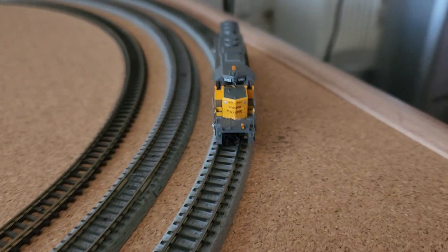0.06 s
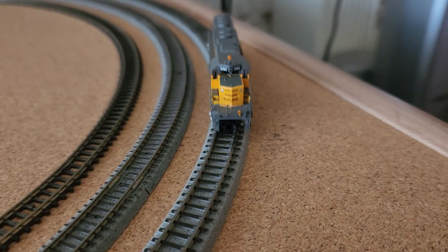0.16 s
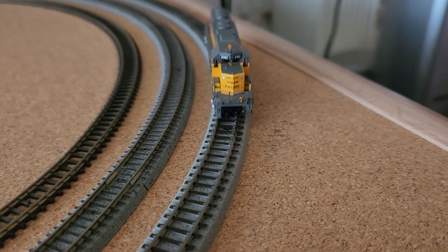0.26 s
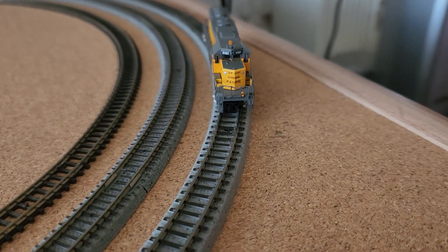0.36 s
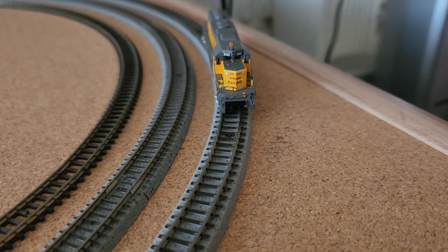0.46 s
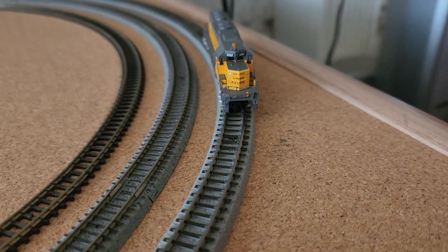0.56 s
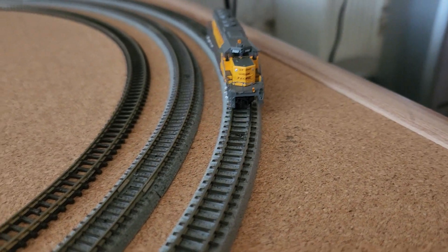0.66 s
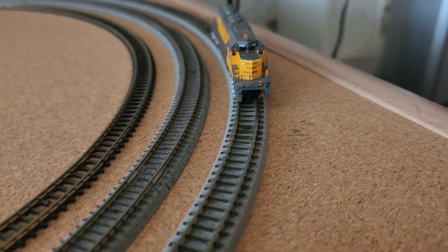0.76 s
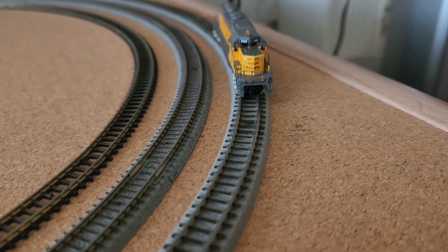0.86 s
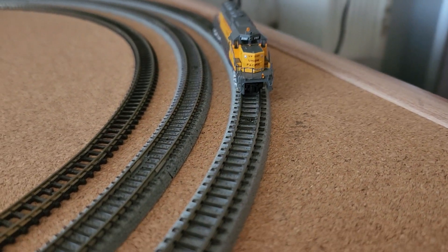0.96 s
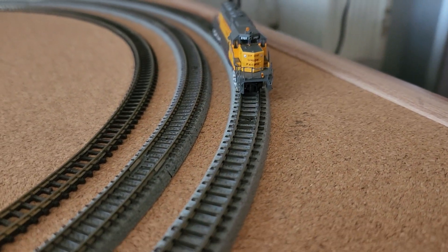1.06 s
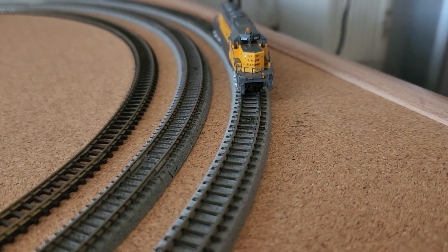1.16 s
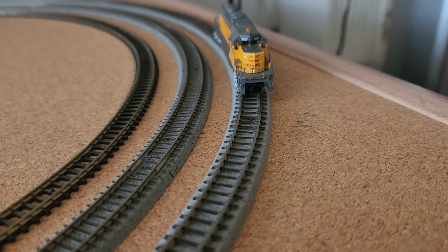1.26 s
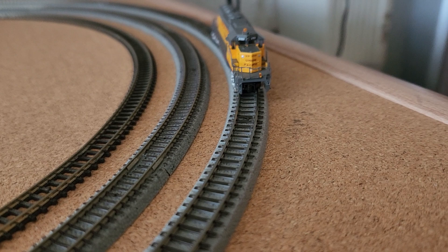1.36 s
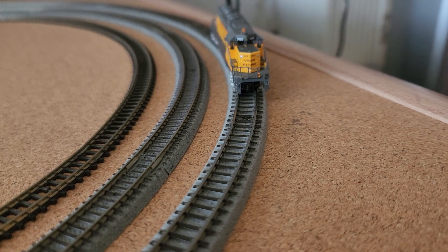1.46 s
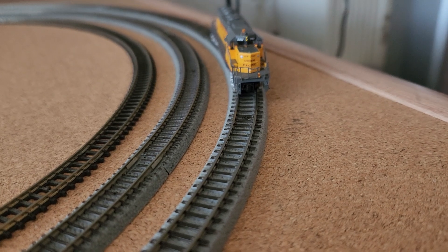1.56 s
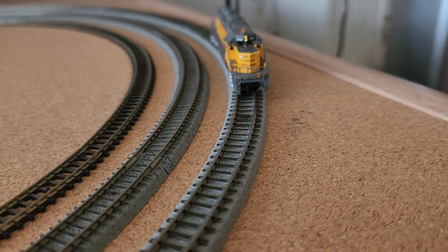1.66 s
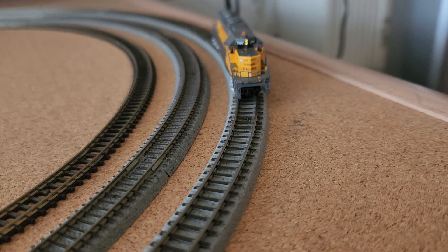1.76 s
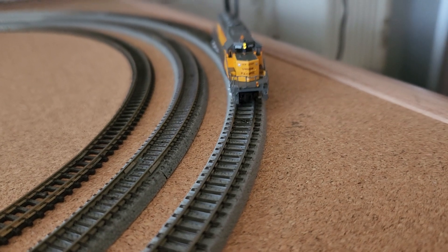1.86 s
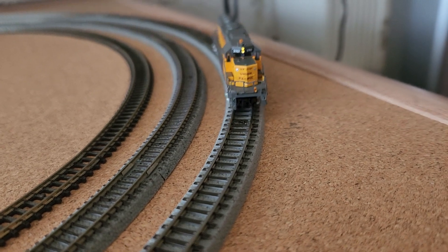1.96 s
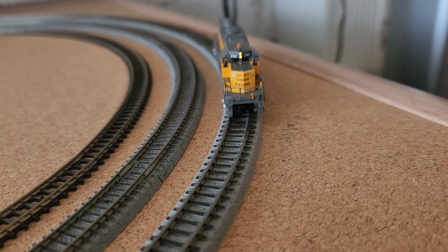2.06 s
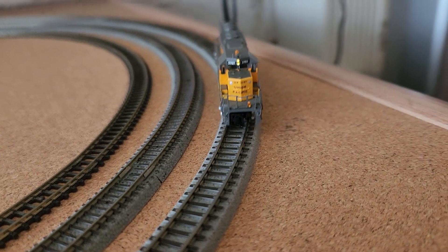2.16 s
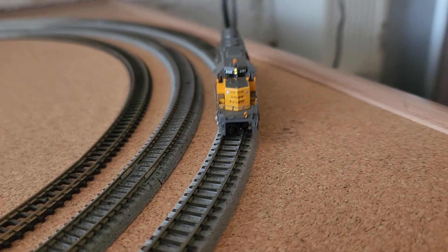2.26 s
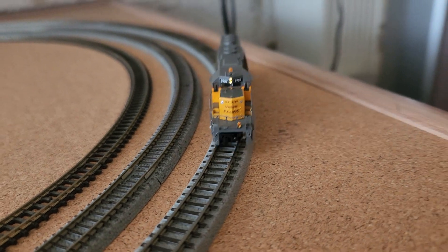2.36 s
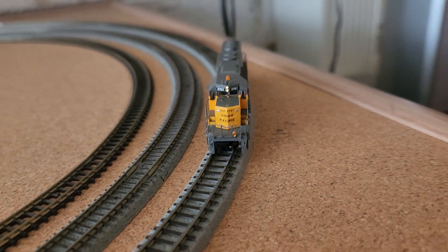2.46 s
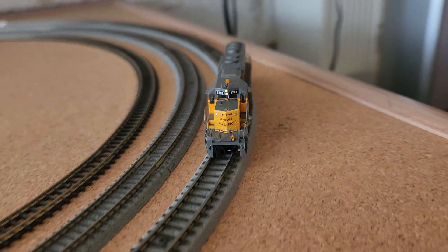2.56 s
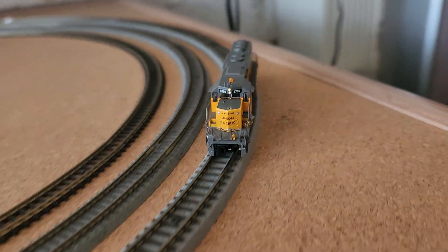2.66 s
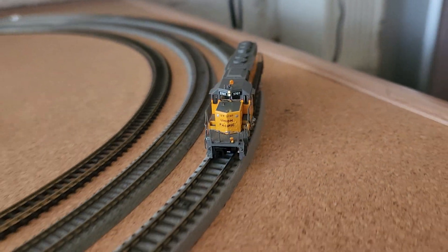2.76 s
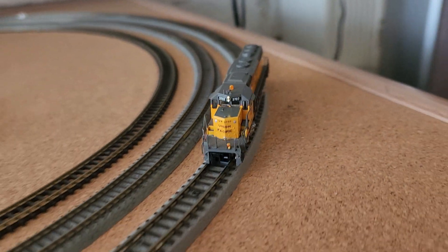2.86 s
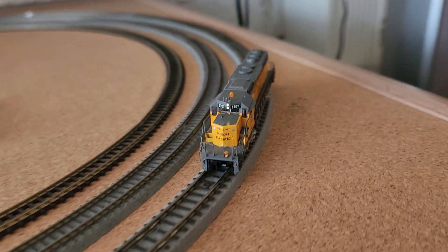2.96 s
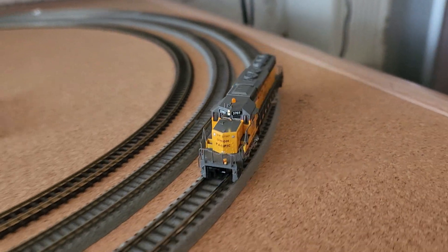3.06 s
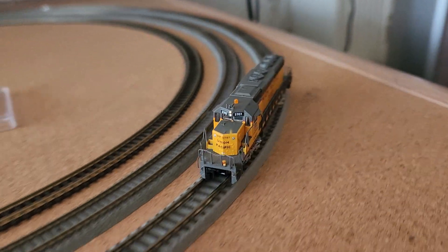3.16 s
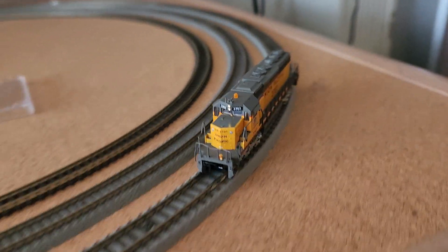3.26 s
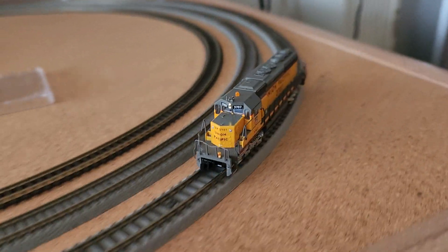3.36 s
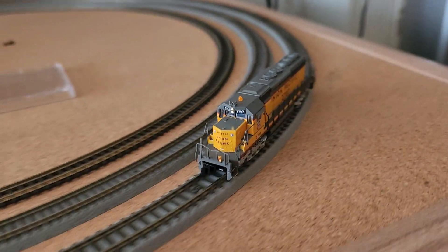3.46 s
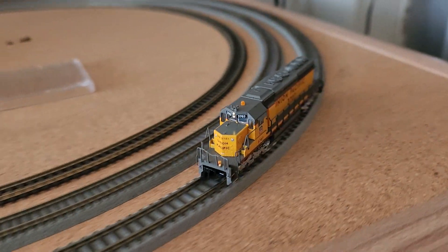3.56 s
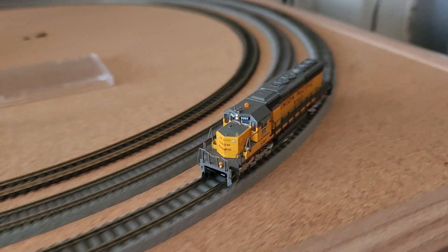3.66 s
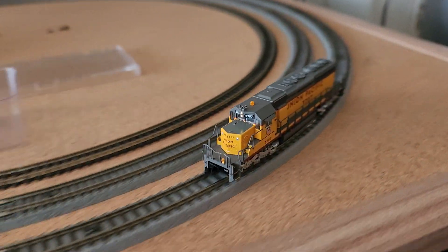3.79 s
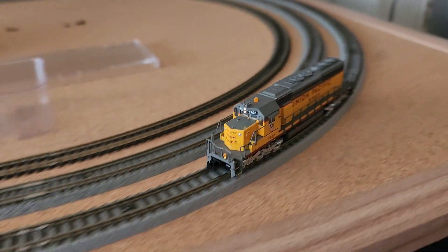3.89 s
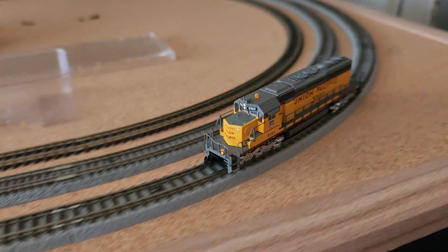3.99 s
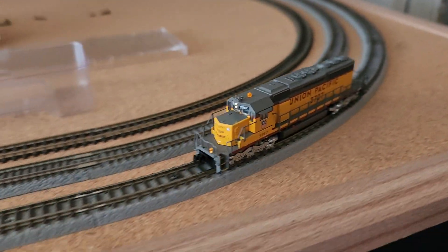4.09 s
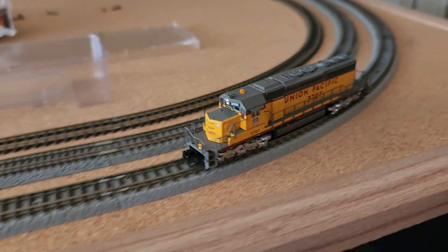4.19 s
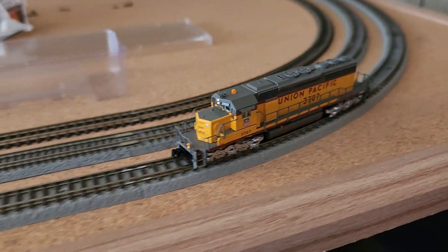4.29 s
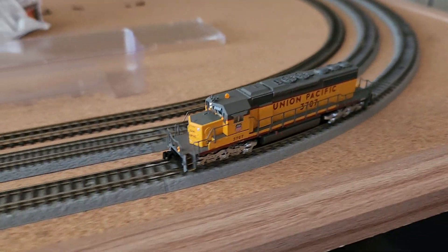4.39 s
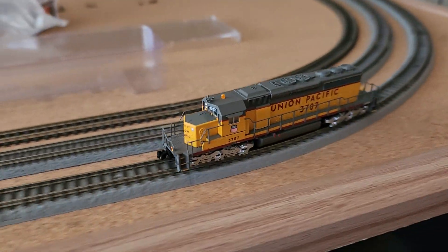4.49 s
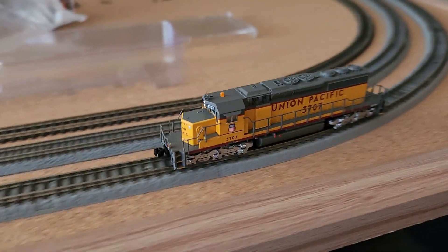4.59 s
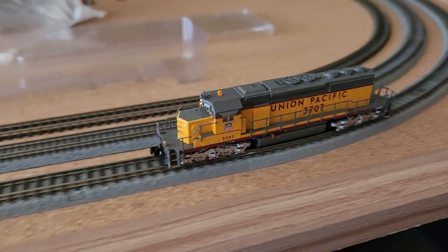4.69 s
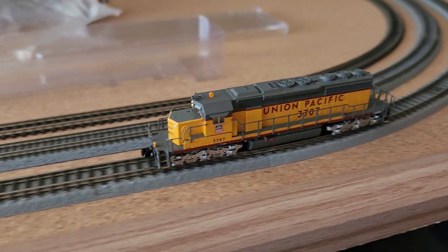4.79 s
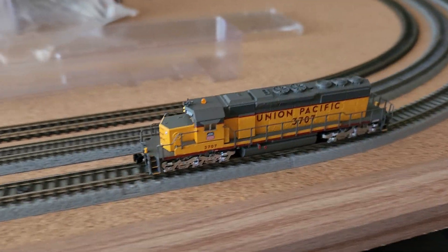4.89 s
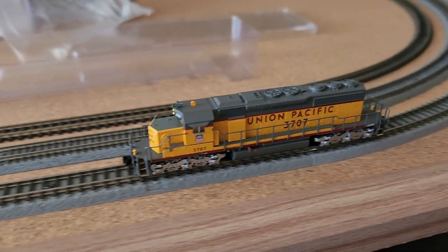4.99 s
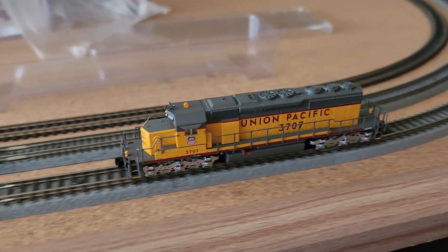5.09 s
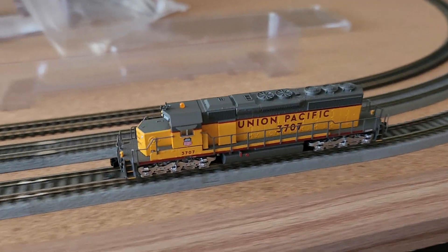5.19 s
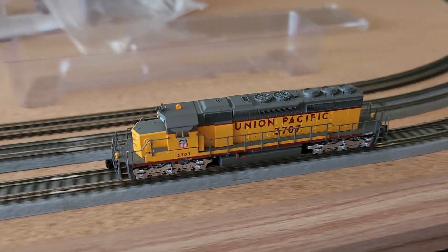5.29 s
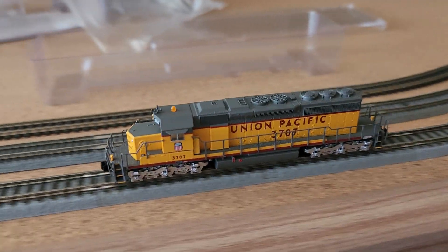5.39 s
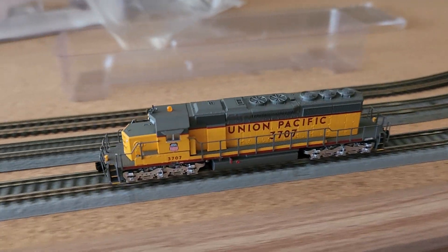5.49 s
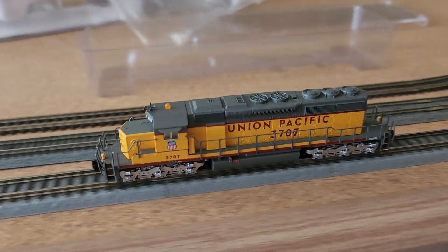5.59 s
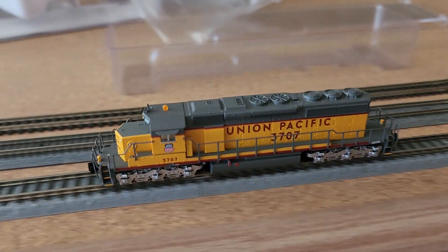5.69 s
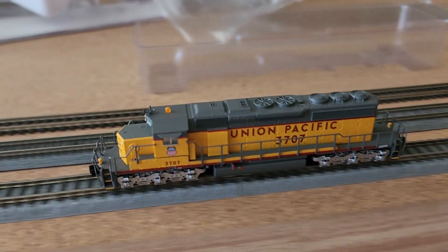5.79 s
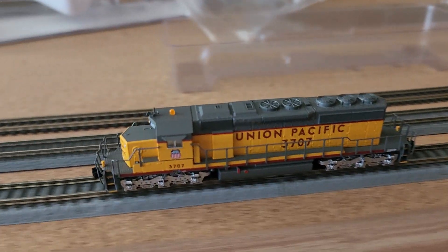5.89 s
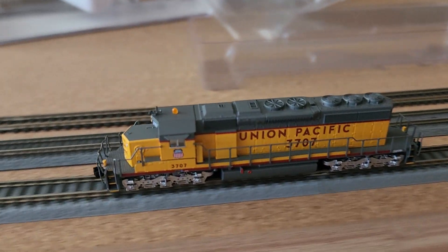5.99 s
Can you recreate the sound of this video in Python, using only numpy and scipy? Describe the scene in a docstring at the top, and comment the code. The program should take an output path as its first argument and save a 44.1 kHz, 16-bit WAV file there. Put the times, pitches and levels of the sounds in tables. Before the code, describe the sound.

A model locomotive rolls on a tabletop track with a gritty rumble and slows to a stop. Soft knocks on the board, a small switch click and a brief rub follow, then one heavy thump close to the microphone on the left. The train sets off again, wheels ticking over joints and hissing on the rails, while a thin gear whine and a low motor hum grow as it passes close by in a quiet room.

```python
"""Model locomotive on a tabletop

A small locomotive rolls to a halt on a cork-covered table. Soft knocks, a switch click and a heavy thump
follow, then it sets off again past a hand-held phone. Wheels shake the board, tick over joints and hiss
on the rails; gears whine, the three-pole motor hums and its brushes rasp in the shell, in a quiet room."""
import sys
import numpy as np
from scipy import signal
from scipy.fft import rfft, irfft
from scipy.io import wavfile
from scipy.ndimage import uniform_filter1d

SR = 44100
rng = np.random.default_rng(int(sys.argv[2]) if len(sys.argv) > 2 else 0)


def wrap_up_sound(samples):
    """Save the sound to the file named by the first command line argument, as 16-bit audio."""
    columns = np.atleast_2d(samples).T
    # keep every value between -1 and 1, then stretch to whole-number steps
    tamed = np.clip(columns, -1, 1)
    steps = np.round(tamed * 32767).astype(np.int16)
    wavfile.write(sys.argv[1], SR, steps)


N = 266364
T = np.arange(N) / SR

# resonances of the rails and wheel flanges: f/Hz, width/Hz, nose-on level/dB, side-on level/dB
RAIL_MODES = [(5330, 1000, -0.5, -14.5), (6510, 600, 0.5, -9.5), (7210, 600, 5.5, -4),
              (8270, 1900, -3, -10)]
FLANGE_MODES = [(10040, 440, -15, 4), (11060, 800, -0.5, 2), (12570, 1200, 2, 0), (15200, 2800, 0.5, -4.5)]


def undb(db):
    """Decibels to gain."""
    return 10 ** (np.asarray(db) / 20)


def unit(x):
    """Scale to rms 1."""
    return x / np.sqrt(np.mean(x ** 2))


def curve(points):
    """Automation lane through (time, value) points."""
    return np.interp(T, *np.transpose(points))


def pan(db):
    """Stereo gains with the left db louder than the right."""
    return undb(db * np.array([[.5], [-.5]]))


def walk(rate_hz):
    """Smooth random drift: held steps, slewed twice; rms 1."""
    hold = int(SR / rate_hz)
    steps = np.repeat(rng.standard_normal(N // hold + 1), hold)
    return unit(uniform_filter1d(uniform_filter1d(steps, hold), hold)[:N])


def add(out, start, sound, pan_db=0., lag_ms=0.):
    """Mix in a short mono sound; it reaches the right channel lag_ms later."""
    for ch, gain in enumerate(pan(pan_db)):
        i = int((start + ch * lag_ms / 1000) * SR)
        out[ch, i:i + len(sound)] += gain * sound[:N - i]


def stereo_noise(grain, pan_db, coherence, lag_ms):
    """Noise textured by grain: a shared part, lag_ms later on the left, plus a diffuse part."""
    shared, left, right = rng.standard_normal((3, N)) * grain
    delay = np.exp(-2j * np.pi * np.fft.rfftfreq(N, 1 / SR) * lag_ms / 1000)
    direct = np.array([irfft(rfft(shared) * delay, N), shared])
    return (np.sqrt(coherence) * direct + np.sqrt(1 - coherence) * np.array([left, right])) * pan(pan_db)


def resonate(x, modes, side=0., wander_db=0.):
    """Bank of steep resonances; side morphs their levels from nose-on (0) to side-on (1)."""
    out = 0
    for k, (hz, width, nose_db, side_db) in enumerate(modes):
        b, a = signal.iirpeak(hz, hz / (1.55 * width), fs=SR)
        db = nose_db + side * (side_db - nose_db)
        if wander_db:
            db = db + wander_db * (walk(11) + np.array([walk(2.5), walk(2.5)]))
        out = out + (-1) ** k * undb(db) * signal.lfilter(b, a, signal.lfilter(b, a, x))
    return out


def ring(modes, detune=0.):
    """Decaying modes of a struck body, each swelling over its first cycle; peak 1."""
    t = T[:SR // 2]
    tuning = 1 + detune * rng.standard_normal(len(modes))
    y = sum(undb(db - 60 * t / t60) * (1 - np.exp(-hz * t)) * np.sin(2 * np.pi * hz * tune * t)
            for (hz, db, t60), tune in zip(modes, tuning))
    return y / np.abs(y).max()


def strike(modes, contact_s, detune):
    """Modes driven by a short, crumbling contact; peak 1."""
    t = T[:int(contact_s * SR)]
    crumbs = np.abs(rng.standard_normal(len(t))) * rng.choice([-1, 1, 1], len(t))
    force = crumbs * np.sin(np.pi * np.sqrt(t / contact_s))
    force = np.convolve(force, np.hanning(SR // 3000))  # soft fingers and cork dull the top
    y = signal.fftconvolve(ring(modes, detune), force)
    return y / np.abs(y).max()


def rolling(brush_gate):
    """Gritty rolling and rubbing noise excites the board, roadbed, shell, rails and flanges."""
    # resonances of each part: f/Hz, width/Hz, nose-on level/dB, side-on level/dB
    board_bass = [(148.6, 27.5, 5.5, -3.5), (197.7, 21, -3, -1.5), (244, 42.5, -7, -3),
                  (302.1, 18.5, 2.5, -6.5), (355.6, 35, -8, -5.5)]
    board_middle = [(416, 58, -0.5, -25.5), (538.6, 46, 5, 0.5), (638, 64, -4, 3.5), (800, 105, -4.5, -2)]
    roadbed = [(984, 360, -8, -14), (1230, 350, -2.5, -8), (1300, 73, 5, -3), (1446.5, 93, 1.5, -6),
               (1923, 630, -14.5, -10.5)]
    shell = [(2110, 440, -4, 8.2), (3116, 730, -5.5, 13.2), (4072, 520, -0.5, 17.6)]
    parts = [board_bass, board_middle, roadbed, shell, RAIL_MODES, FLANGE_MODES]
    # fader of each part: base gain/dB, effort slope/(dB/dB), boost when near/dB, boost side-on/dB
    faders = [(-53.5, 0.6, -1, -2.5), (-49, 1.29, -5, -3.5), (-53.5, 1.3, -0.3, -4.5),
              (-67.5, 1.25, 9, 4.5), (-62.5, 1.27, 2, -0.5), (-73, 1.64, 4.5, 12.5)]
    # stereo image of each part: pan/dB, coherence/0-1, left lag/ms
    images = [(4, 0.88, -0.39), (9.5, 0.69, -0.056), (8, 0.27, -0.054), (5.5, 0.21, 0.195),
              (8, 0.18, 0.104), (10, 0, -0.101)]
    # rolling effort, 0 at full pace: t/s, level/dB
    effort = [(0, 0.5), (.3, -2.5), (.55, -8), (.74, -20), (.9, -50.5), (1.58, -12.5), (1.78, -10.5),
              (1.95, -4.5), (2.3, -2), (2.75, -1), (3.7, 0), (4.7, -1), (5.1, -1.5), (5.55, -0.5),
              (6.04, .5)]
    # how far the flank has turned to the phone: t/s, side-on/0-1
    heading = [(2.5, 0.15), (3.5, 0.1), (4.3, 0.33), (5.1, 0.64)]
    # swells on top of the effort: t/s, board bass/dB, roadbed growl/dB, shell rasp/dB
    surges = [(2.1, -0.5, -1, -1), (2.25, 5.5, -0.5, -2), (2.65, -3.5, -0.5, 0.5), (2.9, 0, 4.5, 3),
              (3.37, 1, 1.5, -2.5), (3.698, 3.5, 0.5, 0), (4.18, 2.5, 2.5, -1), (4.75, -4.5, 0, -1),
              (5.45, 2, -1, 0), (6.04, 2.5, -1, 1.5)]
    times, *lanes = np.transpose(surges)
    bass, growl, rasp = (np.interp(T, times, lane) for lane in lanes)
    swells = [bass, 0, growl, rasp, 0, 0]
    effort_db, side = curve(effort), curve(heading)
    near = curve([(2.84, 0), (3.46, 1)])
    jolt_db = .64 * walk(14)  # uneven track shakes every part at once
    grit = undb(1.23 * walk(300))
    grains = [grit, grit, grit, grit * brush_gate, grit, grit]
    out = 0
    for modes, fader, grain, image, swell_db in zip(parts, faders, grains, images, swells):
        base_db, slope, near_db, side_db = fader
        sound = resonate(stereo_noise(grain, *image), modes, side, wander_db=1.6)
        running_rms = np.sqrt(uniform_filter1d(sound.mean(axis=0) ** 2, size=SR))
        db = base_db + swell_db + slope * effort_db + near_db * near + side_db * side + jolt_db
        out = out + sound / running_rms * undb(db)
    return out * pan(-4 * side)  # the image slides right as the flank comes round


def curve_hiss(width_hz=650):
    """Wheels bear on the curve: narrow bands of hiss that glide upward."""
    # wheel hisses: t/s, length/s, start f/Hz, end f/Hz, level/dB, pan/dB
    glides = [(0, .5, 7300, 8100, -72, 9), (4.6, 1.3, 10700, 11600, -72, -6)]
    lowpass = signal.butter(2, width_hz / 2, fs=SR, output="sos")
    out = np.zeros((2, N))
    for start, length, from_hz, to_hz, db, pan_db in glides:
        progress = T[:int(length * SR)] / length
        flutter = signal.sosfilt(lowpass, rng.standard_normal((2, len(progress))))
        phase = 2 * np.pi * np.cumsum(from_hz + (to_hz - from_hz) * progress) / SR
        hiss = unit(flutter[0] * np.cos(phase) + flutter[1] * np.sin(phase))
        add(out, start, undb(db) * hiss * np.sin(np.pi * progress), pan_db)
    return out


def room_tone(air_db=-57.5, mains_hz=58.4, mains_db=-64.5):
    """Still air, wavering mains hum and a low rumble through the table."""
    # spectrum of the air: f/Hz, relative level/dB
    air_spectrum = [(13, -41), (22, -22.5), (97, -5.5), (121, -13), (247, -30), (806, -37), (1790, -45.5),
                    (2700, -50.5), (7400, -56), (9000, -58), (15700, -66)]
    # swell of the table rumble: t/s, level/dB
    rumble_level = [(0.44, -64.5), (3.6, -53), (4.75, -56.5), (6.04, -53.5)]
    f = np.fft.rfftfreq(N, 1 / SR) + 1
    hz, db = np.transpose(air_spectrum)
    mid, side = rfft(rng.standard_normal((2, N))) * undb(np.interp(np.log(f), np.log(hz), db))
    side = side * np.clip(f / 500, .15, 1)  # nearly mono in the bass
    lean = undb(np.clip(np.log2(f / 300), 0, 4.3))  # brighter on the left
    table_ring = 1 + 2 / (1 + ((f - 1420) / 90) ** 2) + 1.9 / (1 + ((f - 760) / 70) ** 2)
    air = irfft(table_ring * np.array([(mid + side) * lean, (mid - side) / lean]), N)
    air = air / np.std(air.mean(axis=0)) * undb(air_db)
    rumble_modes = [(34.4, 17, -8.5, -3), (63.4, 18.3, -19.5, 0), (80.3, 14.2, -6.5, -2.5)]
    rumble = unit(resonate(rng.standard_normal(N), rumble_modes)) * undb(curve(rumble_level))
    mains = undb(mains_db + 4.9 * walk(3.53)) * np.sin(2 * np.pi * mains_hz * T)
    return air + (rumble + mains) * pan(1.2)


def table_knocks():
    """Soft finger knocks ring the cork-covered board, each with its own brightness."""
    # knocks: t/s, peak level/dB, pan/dB, tilt about 700 Hz/(dB/octave)
    knocks = [(0.726, -60, 4, -8), (0.783, -49, 3, -7), (0.856, -40.5, 1, -0.5), (0.917, -47, 4, -2.5),
              (1.001, -49, 3, 2.5), (1.061, -58, 0, -7), (1.256, -57.5, 7, 6), (1.319, -51, 7, 0),
              (1.353, -59.5, 14, 0), (1.432, -46.5, 3, 4), (1.49, -55, 3, -2), (1.564, -48.5, 5, 0),
              (1.591, -48, -9, -2), (1.617, -39, 10, -2), (2.474, -42, 15, -7)]
    # modes of the lightly struck board: f/Hz, level/dB, t60/s
    board_modes = [(430, -8, .035), (560, -3, .04), (760, 0, .045), (1150, -4, .03), (1420, -2, .035)]
    out = np.zeros((2, N))
    for start, peak_db, pan_db, tilt in knocks:
        modes = [(hz, db + tilt * np.log2(hz / 700), t60) for hz, db, t60 in board_modes]
        add(out, start, undb(peak_db) * strike(modes, contact_s=.002, detune=.02), pan_db)
    return out


def switch_click(snap_s=.8618, creep_s=.03, level_db=-44.5):
    """The lever creeps, snaps and bounces once; the room answers with a faint, duller tail."""
    # ring of the switch: f/Hz, width/Hz, level/dB
    switch_modes = [(2390, 4000, -11.5), (3680, 470, -2), (6500, 1150, -1.5), (8800, 460, -11),
                    (10230, 170, 0.5), (13880, 650, 5.5)]
    t = T[:SR // 4] - creep_s
    creep = undb(-16 + 60 * t / .015)
    snap = undb(-60 * t / .004)
    bounce = undb(-12 - 60 * abs(t - .0028) / .006)
    settle = undb(-17 - 60 * t / .04)
    chatter = rng.standard_normal((2, len(t))) * np.where(t < 0, creep, snap + bounce + settle)
    tail = rng.standard_normal((2, len(t))) * (t > 0) * undb(-24 - 60 * t / .24)
    out = np.zeros((2, N))
    for ch, (far_db, tilt) in enumerate([(0, 0), (-11, -4)]):  # softer and darker on the right
        modes = [(hz, width, db + tilt * np.log2(hz / 4000), 0) for hz, width, db in switch_modes]
        dull = [(hz, 2.5 * width, db - 4 - 8 * np.log2(hz / 4000), 0) for hz, width, db, _ in modes[1:]]
        click = unit(resonate(chatter[ch], modes) + resonate(tail[ch], dull))
        out[ch, int((snap_s - creep_s) * SR):][:len(t)] += undb(level_db + far_db) * click
    return out


def scuffs():
    """Brief rubs: bands of friction noise with a soft attack and a quick decay."""
    # rubs: t/s, t60/s, level/dB, top f/Hz
    rubs = [(1.424, 0.15, -51.5, 4800), (1.42, 0.28, -63, 9000)]
    out = np.zeros((2, N))
    for start, t60, db, top_hz in rubs:
        t = T[:int(t60 * SR)]
        band = signal.butter(5, [1000, top_hz], "band", fs=SR, output="sos")
        rub = unit(signal.sosfilt(band, rng.standard_normal((2, len(t)))))
        out[:, int(start * SR):][:, :len(t)] += rub * undb(db - 60 * t / t60) * np.tanh(t / .012)
    return out * pan(6)


def gear_whine(hz=3570, width_hz=110):
    """The gears sing a narrow, rough, flickering note once the current returns."""
    # swell of the whine: t/s, level/dB
    whine_level = [(1.5, -98), (1.76, -86), (2.2, -77.5), (2.75, -70.5), (3.7, -65.5), (4.4, -66.5),
                   (5.35, -60), (5.45, -72), (6.04, -62)]
    noise = stereo_noise(grain=1, pan_db=5.8, coherence=.19, lag_ms=0)
    note = resonate(noise, [(hz, width_hz, 0, 0)])
    return note / np.std(note.mean(axis=0)) * undb(curve(whine_level) + 1.3 * walk(12))


def thump(start=1.6253, push_s=.0011, push_db=-6, body_db=-19, crack_db=-52, rattle_db=-29):
    """One heavy blow by the left microphone: a pressure pulse, a boom, a dry crack and rattling track."""
    # modes rung by the blow: f/Hz, level/dB, t60/s
    modes = [(78.2, -10.5, 0.3), (114.6, -4.5, 0.2), (169, -8.5, 0.2), (243, -6, .08), (332, 0.5, 0.07),
             (506, 3, .045), (774, 0, 0.045), (1080, 4, 0.02), (1420, -1, 0.035)]
    out = np.zeros((2, N))
    push = np.hanning(int(push_s * SR))
    out[0, int(start * SR):][:len(push)] -= undb(push_db) * push  # the pulse hits the left only
    body = undb(body_db) * np.convolve(ring(modes), push / push.sum())
    boom = signal.sosfilt(signal.butter(2, 130, fs=SR, output="sos"), body)
    add(out, start, boom, pan_db=2, lag_ms=.2)
    add(out, start, body - boom, pan_db=9, lag_ms=1)
    t = T[:SR // 20]
    crack = uniform_filter1d(rng.standard_normal(len(t)), size=4)
    add(out, start, undb(crack_db - 60 * t / .036) * crack, pan_db=6)
    for ch in range(2):
        rattle = strike(modes[2:], contact_s=.006, detune=.08)
        out[ch, int((start + .002) * SR):][:len(rattle)] += undb(rattle_db) * rattle
    return out


def joint_ticks():
    """Wheels tick over rail joints, ringing the rails and flanges."""
    # joint hits: t/s, gain/dB, flange ring against rail ring/dB
    joints = [(1.8902, -50.5, -14), (2.0337, -54, -20), (2.081, -56, -21.5), (3.4788, -48, -3),
              (3.9844, -49, -3), (5.527, -52, 6)]
    t = T[:SR // 40]
    envelope = undb(-60 * t / .045) * np.tanh(t / .00038)
    out = np.zeros((2, N))
    for start, db, flange_db in joints:
        burst = rng.standard_normal((2, len(t))) * envelope
        tick = resonate(burst[0], RAIL_MODES) + undb(flange_db) * resonate(burst[1], FLANGE_MODES)
        add(out, start, undb(db) * tick, pan_db=6)
    return out


def motor(brush_depth=.35, fade_s=.11):
    """The armature hums and its brushes spark three times a turn; returns the hum and the rasp's gate."""
    # armature run: t/s, rotation f/Hz, hum level/dB
    run = [(3.4, 94.0, -56), (4.25, 97, -52), (4.52, 90, -50), (5.169, 93.7, -56.5), (5.31, 93.5, -49.5),
           (6.0, 95.3, -50.5)]
    # hum partials: multiple of the rotation, level/dB
    partials = [(1, -1.5), (2, -14)]
    # brush spark at each commutator gap: level/dB
    gap_db = [0, -11, -13]
    times, hz, hum_db = np.transpose(run)
    turns = np.cumsum(np.interp(T, times, hz) * (1 + .008 * walk(25))) / SR
    gap = (3 * turns).astype(int) % 3
    spark = undb(gap_db)[gap] * np.exp(-(3 * turns % 1) / .7)
    fade_in = np.clip((T - times[0]) / fade_s, 0, 1)
    depth = fade_in * brush_depth
    hum = sum(undb(db + 3.6 * walk(8.3)) * np.sqrt(2) * np.sin(2 * np.pi * k * turns)
              for k, db in partials)
    hum = hum * fade_in * undb(np.interp(T, times, hum_db))
    return hum * pan(1), 1 - depth + depth * unit(spark)


def scene():
    """The train and the handling noises over the room tone."""
    hum, brush_gate = motor()
    train = hum + rolling(brush_gate) + joint_ticks() + gear_whine() + curve_hiss()
    handling = table_knocks() + thump() + switch_click() + scuffs()
    return train + handling + room_tone()


def record(dry):
    """The phone cuts the top steeply at 15.8 kHz."""
    return signal.sosfilt(signal.ellip(10, .2, 80, 15800, fs=SR, output="sos"), dry)


dry = scene()
out = record(dry)
wrap_up_sound(out)
```